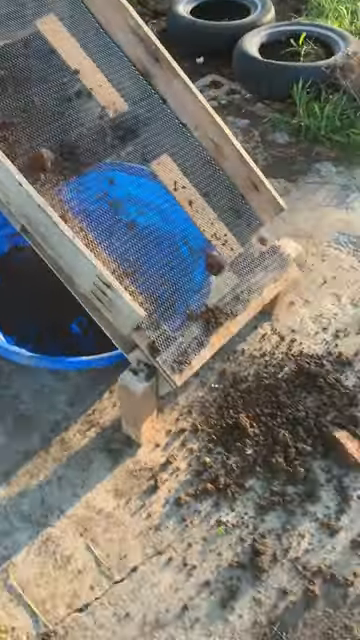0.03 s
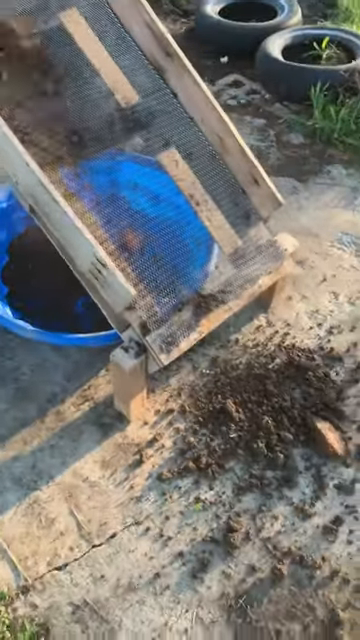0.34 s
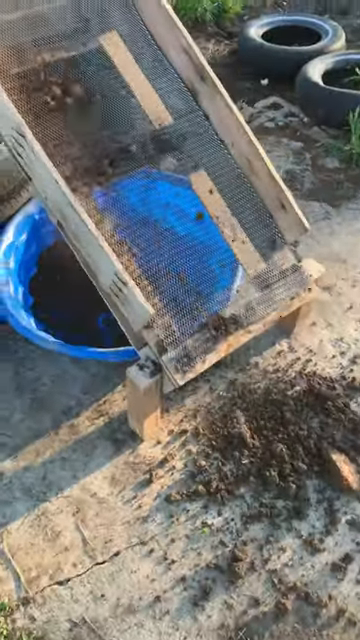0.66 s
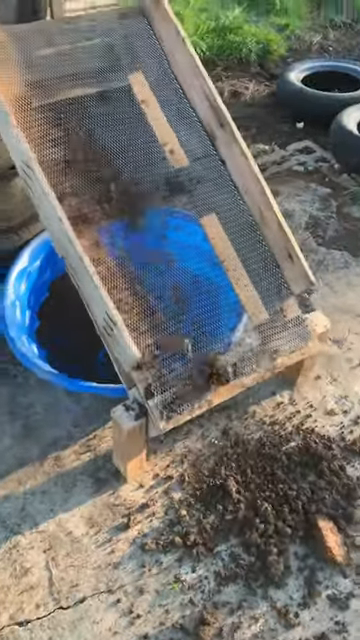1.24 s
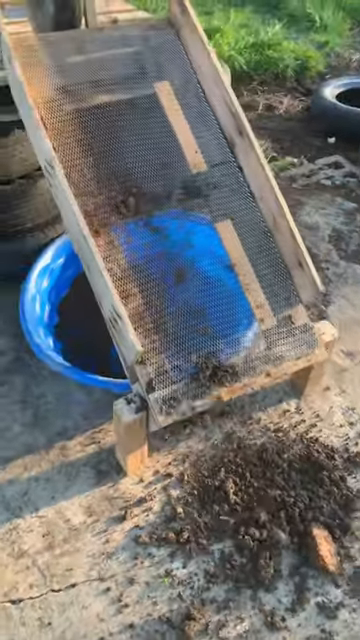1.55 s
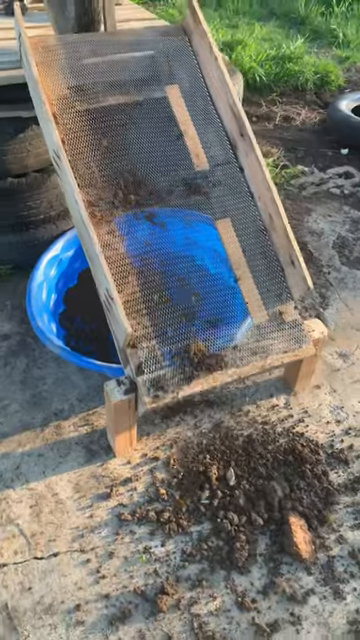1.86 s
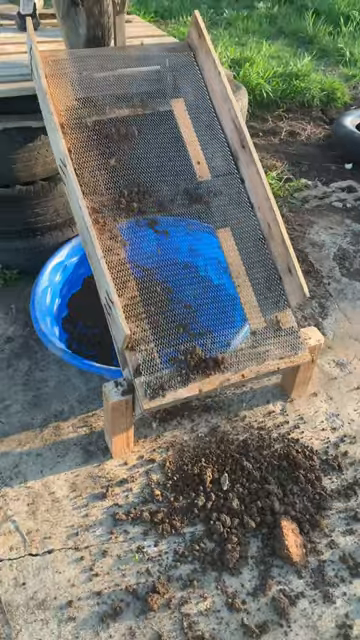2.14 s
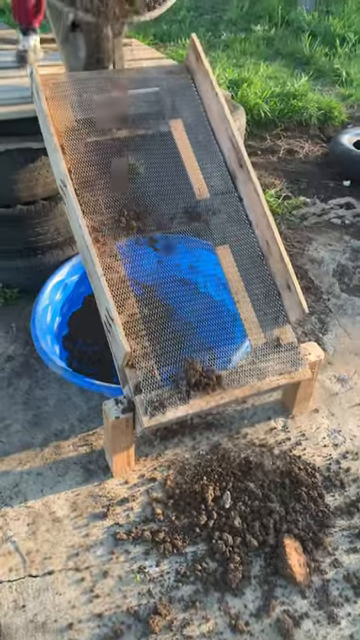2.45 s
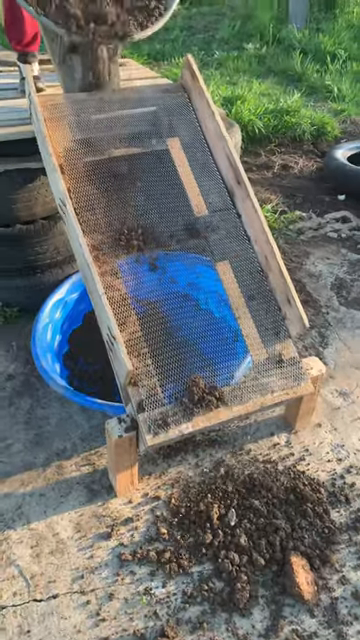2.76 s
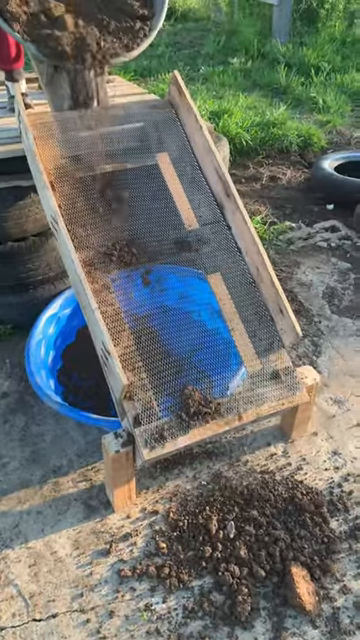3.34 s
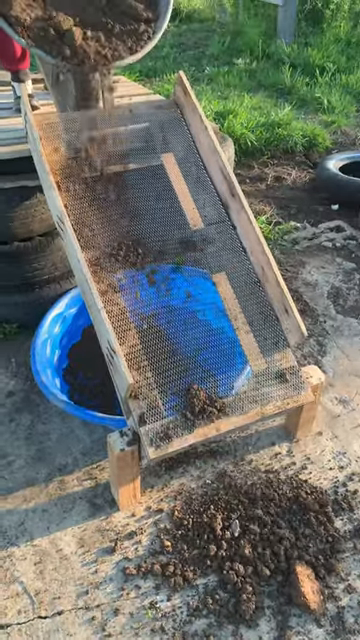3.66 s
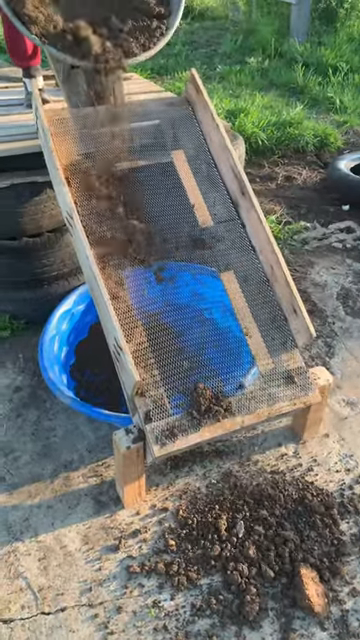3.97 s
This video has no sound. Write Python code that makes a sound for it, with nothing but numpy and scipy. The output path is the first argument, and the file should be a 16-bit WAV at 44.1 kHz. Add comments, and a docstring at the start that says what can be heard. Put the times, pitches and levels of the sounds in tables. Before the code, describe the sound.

Dry soil pours down a sloping wire-mesh sieve in a continuous, uneven hiss. Crumbs patter, stones tick on the wires, clods thud and hard lumps knock on wood and concrete. A faint bird chirps over a low outdoor rumble.

```python
"""A rush of dry soil hisses and thuds as it is tipped from a bucket down a sloping wire-mesh sieve.
Fine earth hisses through the mesh, stones tick on the wires, crumbs patter and clods thud on screen
and tub. Hard lumps burst, or knock on the wooden frame and the concrete. Behind them are a low outdoor
rumble and a faint, distant bird. Left and right differ, which makes the soil sound wide."""
import sys
import numpy as np
from scipy import signal
from scipy.fft import rfft, irfft, next_fast_len
from scipy.io import wavfile
from scipy.ndimage import map_coordinates

SR = 44100
rng = np.random.default_rng(int(sys.argv[2]) if len(sys.argv) > 2 else 0)


def wav_out(sig):
    """Save sig, one row per channel (or a flat mono array), as 16-bit PCM at SR to the path in sys.argv[1]."""
    wavfile.write(sys.argv[1], SR, np.round(np.clip(np.atleast_2d(sig).T, -1, 1) * 32767).astype(np.int16))


N = 176400  # 4 seconds

# How strongly earth runs down the mesh: time_s, level_db (levels in all tables are relative)
EARTH_FLOW = [(0.0, -29.5), (0.05, -37.5), (0.09, -32), (0.18, -30.5), (0.27, -35), (0.39, -34.5),
              (0.45, -31.0), (0.72, -37.5), (0.81, -32), (0.92, -36), (0.96, -32), (0.99, -36), (1.26, -38),
              (1.32, -34.5), (1.44, -38.5), (1.56, -37), (1.59, -34), (1.71, -39), (1.74, -35),
              (1.83, -43.5), (1.87, -39.5), (2.07, -35.5), (2.13, -37), (2.18, -35.5), (2.28, -42.5),
              (2.42, -34.5), (2.61, -40.5), (2.68, -36), (3.02, -36.5), (3.07, -41.5), (3.13, -37),
              (3.27, -36.5), (3.42, -42.5), (3.54, -35.5), (3.62, -39), (3.7, -33), (3.79, -39),
              (3.87, -39), (3.99, -30.5)]
# Tone of grains hitting wire: frequency_hz, gain_db
GRAIN_TONE = [(300, -37.5), (1200, 4.5), (2700, 1.5), (4200, 1.5), (5800, -1), (7300, -3), (8400, -1),
              (11800, -2.5), (12900, -8.5), (13700, -13.5), (15200, -15.5), (16500, -34)]


def amp(db):
    """Turns decibels into a gain."""
    return 10 ** (np.asarray(db) / 20)


def unit(x):
    """Scales a sound to an average (rms) level of 1."""
    return x / np.sqrt(np.mean(x ** 2) + 1e-20)


def along(points, hz):
    """Reads between (frequency_hz, value) points on a log scale."""
    point_hz, values = np.transpose(points)
    return np.interp(np.log(hz + 1), np.log(point_hz + 1), values)


def flow(rows):
    """A gain for every sample, gliding between (time_s, level_db) rows."""
    time_s, level_db = np.transpose(rows)
    return amp(np.interp(np.arange(N) / SR, time_s, level_db))


def wobble(per_s):
    """A smooth curve through per_s random values a second."""
    return map_coordinates(rng.standard_normal(1024), [np.arange(N) * per_s / SR], mode="wrap")


def filtered(x, response):
    """Scales and shifts each frequency of x by response(hz)."""
    size = next_fast_len(N + SR // 4)
    return irfft(rfft(x, size) * response(np.fft.rfftfreq(size, 1 / SR)), size)[..., :N]


def coloured(x, tone, size=4096):
    """Gives x the tone drawn by (frequency_hz, gain_db) points."""
    cepstrum = irfft(np.log(amp(along(tone, np.fft.rfftfreq(size, 1 / SR)))))
    # Folded so the filter rings after a hit, never before it.
    cepstrum[1:size // 2] *= 2
    cepstrum[size // 2 + 1:] = 0
    return signal.fftconvolve(x, irfft(np.exp(rfft(cepstrum))))[:len(x)]


def add(track, start_s, sound):
    """Mixes a sound into a track."""
    part = track[max(0, round(start_s * SR)):][:len(sound)]
    part += sound[:len(part)]


def contacts(times, hz, gains, cycles, size):
    """Tiny impacts, each a sine wave that fades 60 dB in so many cycles."""
    samples = np.arange(size)
    turns = hz[:, None] * samples / SR
    rings = gains[:, None] * np.sin(2 * np.pi * turns) * np.exp(-np.log(1000) * turns / cycles)
    positions = (times * SR).astype(int)[:, None] + samples
    return np.bincount(positions.ravel(), rings.ravel())


def shower(count):
    """Random times, signs, pitch offsets and weights of falling grains."""
    draws = rng.random((count, 3))
    weight = np.minimum(-np.log(draws[:, 2]), 4)  # many light, few heavy
    return draws[:, 0] * N / SR, np.sign(draws[:, 1] - .5), rng.standard_normal(count), weight


def patter(per_s, centre_hz, spread, cycles, weight_db, size):
    """A steady rain of small impacts of varied pitch and weight."""
    times, sign, offset, weight = shower(per_s * N // SR)
    hz = np.clip(centre_hz * np.exp(spread * offset), 60, SR / 3)
    rain = contacts(times, hz, sign * amp(weight_db * weight), cycles, size)
    return np.pad(rain, (0, N))[:N]


def lump(hz, spread, cycles, settle_s, fade_db, count, size):
    """One lump lands: a first contact, then weaker ones of scattered pitch."""
    order = np.arange(count)
    progress = (order + rng.uniform(-.5, 0.53, count) * (order > 0)) / count
    pitch = hz * np.exp(spread * rng.permutation(np.linspace(-2, 2, count)) * np.sqrt(progress))
    gains = rng.choice([-1, 1], count) * amp(-fade_db * progress)
    hit = contacts(progress * settle_s, pitch, gains, cycles, size)
    return hit / np.sqrt(np.sum(hit ** 2) / (SR / 100))  # the energy of 10 ms at level 1


def rumble(gain_db=-51, side_db=-11.5):
    """Low outdoor background, nearly alike left and right."""
    # Tone of the background: frequency_hz, gain_db
    tone = [(20, -15), (38, -11), (54, 6.5), (72, 5), (110, -0.5), (200, -2), (600, -3.5), (3000, -35),
            (16000, -58)]
    middle, side = (unit(coloured(rng.standard_normal(N), tone)) for _ in range(2))
    return amp(gain_db) * (middle + amp(side_db) * np.array([side, -side]))


def bird(chirp_s=0.085, top_hz=5300, sag_hz=760):
    """Each chirp is a pure whistle that arches up and down again."""
    # Distant chirps: start_s, level_db
    chirps = [(1.975, -45), (2.62, -38), (2.91, -42), (3.455, -44), (3.745, -45)]
    out, arch = np.zeros(N), np.linspace(-1, 1, int(chirp_s * SR))
    pitch_hz = top_hz - sag_hz * arch ** 2
    whistle = np.sin(2 * np.pi * np.cumsum(pitch_hz) / SR) * np.sqrt(1 - arch ** 2)
    for start_s, level_db in chirps:
        add(out, start_s, amp(level_db) * whistle)
    return out


def bursts(gain_db=-7, rise_s=0.00096, spray_s=0.0064, spray_db=-16):
    """A dry lump breaks with a bright crack and a short spray of grit."""
    # Lumps breaking: start_s, level_db
    breaks = [(0.137, -15.5), (0.2179, -22), (0.3565, -25), (0.7235, -24), (1.59, -21.5), (1.6762, -20),
              (1.703, -26), (1.736, -27), (1.7765, -25), (1.923, -29), (2.2034, -24), (2.3541, -16.5),
              (2.3827, -21.5), (3.1006, -17), (3.3654, -20), (3.6594, -25), (3.9526, -23)]
    # Tone of a burst: frequency_hz, gain_db
    tone = [(300, -27), (1500, -10), (4000, 8.5), (7000, 3.5), (11500, 6.5), (13500, -6), (16000, -20)]
    out, t = np.zeros(N), np.arange(SR // 30) / SR
    crack = t / rise_s * np.exp(1 - t / rise_s)
    spray = amp(spray_db) * np.exp(-t / spray_s)
    for start_s, level_db in breaks:
        add(out, start_s, amp(level_db + gain_db) * (crack + spray) * rng.standard_normal(len(t)))
    return coloured(out, tone)


def knocks(gain_db=-8.8, crack_s=.0007, crack_db=3.5):
    """Hard lumps clack on wood and concrete: a sharp crack, then a short rattle as they settle."""
    # Hard lumps landing: start_s, level_db, pitch_hz
    landings = [(0.0832, -14.5, 1500), (0.1087, -14.5, 1600), (0.1356, -18, 1500), (0.2435, -17.5, 1500),
                (0.3496, -18, 1300), (0.597, -18, 1490), (0.7257, -15.5, 1870), (0.7931, -18.5, 1570),
                (0.8305, -16.5, 1300), (0.8904, -16.5, 1330), (0.9507, -18.5, 1280), (0.9624, -15.5, 1410),
                (1.2131, -10.5, 2170), (1.2194, -13.5, 1400), (1.3194, -19.5, 1330), (1.4827, -17, 1210),
                (1.5793, -16.5, 1190), (1.6272, -14, 1200), (1.7315, -18, 1420), (1.9245, -20, 965),
                (1.9824, -15.5, 990), (2.1041, -18.5, 1490), (2.1644, -18, 966), (2.225, -21, 1310),
                (2.5565, -19, 895), (2.594, -22.5, 1490), (2.703, -17.5, 1400), (2.7427, -17.5, 1550),
                (3.0435, -19, 1530), (3.1014, -12.5, 1490), (3.1353, -19.5, 1200), (3.1788, -19.5, 1430),
                (3.484, -20.5, 1630), (3.5259, -16.5, 1570), (3.5528, -19, 1410), (3.6476, -16.5, 950),
                (3.936, -17.5, 1420)]
    # Tone of a knock: frequency_hz, gain_db
    tone = [(200, -13), (700, -9), (1400, -2.5), (2800, 0.5), (6000, -2.5), (12000, -30)]
    out = np.zeros(N)
    for start_s, level_db, pitch_hz in landings:
        rattle = lump(pitch_hz, spread=0.61, cycles=7, settle_s=.007, fade_db=12, count=11, size=768)
        t = np.arange(len(rattle)) / SR
        crack = amp(crack_db) * np.exp(-t / crack_s) * rng.standard_normal(len(t))
        add(out, start_s, amp(level_db + gain_db) * (rattle + crack))
    return coloured(out, tone)


def small_clods(gain_db=-2.2):
    """Small soft clods drum on screen and tub."""
    # Flow of small clods: time_s, level_db
    tumble = [(0.0, -36.5), (0.63, -32), (0.72, -40), (0.81, -33.5), (1.14, -38), (1.44, -37), (1.62, -31),
              (1.68, -35.5), (1.86, -39), (2.19, -33), (2.25, -38), (2.4, -36), (2.67, -40.5), (2.73, -36),
              (3.45, -41.5), (3.51, -36.5), (3.84, -37.5), (3.92, -33.5), (3.99, -30)]
    # Tone of their drumming: frequency_hz, gain_db
    tone = [(40, -14), (120, -10), (220, -6.5), (340, 3.5), (560, -2.5), (800, 0), (1500, -1.5),
            (4000, -10)]
    rain = patter(per_s=280, centre_hz=472, spread=0.44, cycles=6, weight_db=1.44, size=2048)
    return amp(gain_db) * flow(tumble) * unit(coloured(rain, tone))


def heavy_clods(thud_db=-10):
    """Single heavy clods thud; big soft masses sound deeper and settle more slowly."""
    # Clods landing on screen and tub: start_s, level_db, pitch_hz
    thuds = [(0.007, -20.5, 342), (0.136, -11, 370), (0.148, -18.5, 440), (0.241, -14, 380),
             (0.324, -16, 403), (0.424, -25, 670), (0.592, -15, 312), (0.854, -21.5, 350),
             (0.952, -19, 284), (1.059, -22.5, 690), (1.216, -21.5, 410), (1.36, -19.5, 353),
             (1.622, -16.5, 420), (1.738, -22, 347), (1.982, -20, 293), (1.984, -21, 1010),
             (2.104, -15, 275), (2.18, -22.5, 420), (2.228, -23, 326), (2.356, -19, 298), (2.395, -16, 363),
             (2.439, -19.5, 383), (2.557, -22.5, 600), (2.587, -18.5, 370), (2.673, -23.5, 530),
             (2.73, -20.5, 301), (2.976, -20.5, 426), (3.101, -16, 414), (3.178, -16.5, 330),
             (3.26, -24, 400), (3.377, -19.5, 370), (3.719, -21, 860), (3.845, -22.5, 450),
             (3.878, -19, 320), (3.92, -17, 392), (3.96, -20, 850), (3.982, -17, 383)]
    # Masses slumping into the tub: start_s, level_db, pitch_hz
    slumps = [(0.146, -23, 296), (0.17, -24, 185), (0.25, -22, 190), (0.334, -21, 152), (3.71, -28, 213)]
    # Tone of both: frequency_hz, gain_db
    tone = [(60, -16.5), (180, -8.5), (350, 2), (600, 1.5), (820, 6.5), (1600, -2.5), (4000, -17)]
    out = np.zeros(N)
    for start_s, level_db, pitch_hz in thuds:
        thud = lump(pitch_hz, spread=0.43, cycles=6, settle_s=0.013, fade_db=12.5, count=8, size=2048)
        add(out, start_s, amp(level_db + thud_db) * thud)
    for start_s, level_db, pitch_hz in slumps:
        slump = lump(pitch_hz, spread=0.43, cycles=6, settle_s=0.0241, fade_db=4, count=6, size=4096)
        add(out, start_s, amp(level_db) * slump)
    return coloured(out, tone)


def stones(gain_db=-1.5, ring_s=0.0005, ring_db=-11):
    """A stone strikes a wire: one hard click and a very short ring."""
    # Stones hitting wires: start_s, level_db
    ticks = [(0.1096, -29), (0.136, -20), (0.1904, -28), (0.4122, -32), (0.4713, -24), (0.6717, -30),
             (0.9369, -30.5), (0.9978, -31), (1.0666, -20), (1.2798, -29), (1.674, -29), (1.7047, -24.5),
             (1.7564, -37), (2.0547, -32), (2.204, -28), (2.3557, -20), (2.3835, -24), (2.6968, -25.5),
             (2.7579, -29), (2.9286, -29.5), (3.1026, -25.5), (3.1217, -28), (3.2072, -30), (3.5534, -31),
             (3.7576, -27.5), (3.835, -27.5), (3.9635, -22)]
    # Tone of a tick: frequency_hz, gain_db
    tone = [(2500, -18), (5500, 1), (11500, 3), (16000, -14)]
    out, t = np.zeros(N), np.arange(SR // 300) / SR
    click = t == 0
    for start_s, level_db in ticks:
        ring = amp(ring_db) * np.exp(-t / ring_s) * rng.standard_normal(len(t)) * (t > 0)
        add(out, start_s, amp(level_db) * unit(click + ring))
    return amp(gain_db) * coloured(out, tone)


def crumbs(gain_db=-2.1, clump_db=1.4):
    """Pea-sized crumbs bounce down the mesh in small clumps."""
    # Tone of the crumbs: frequency_hz, gain_db
    tone = [(200, -7), (500, 0), (800, 0.5), (1050, -7.5), (1380, 4.5), (2000, -0.5), (2800, -5.5),
            (4000, 7), (8000, -6)]
    rain = patter(per_s=900, centre_hz=1460, spread=0.49, cycles=8.4, weight_db=2.2, size=512)
    clumps = amp(clump_db * wobble(per_s=70))
    return amp(gain_db) * flow(EARTH_FLOW) * unit(coloured(rain * clumps, tone))


def grit(gain_db=-3.5):
    """Larger sharp grains snap against the wires, each at its own pitch."""
    rain = patter(per_s=450, centre_hz=6160, spread=0.54, cycles=8, weight_db=4.4, size=384)
    return amp(gain_db) * flow(EARTH_FLOW) * unit(coloured(rain, GRAIN_TONE))


def fine_earth(gain_db=-0.7, per_s=9000, weight_db=4.0, clump_db=1.8):
    """Thousands of grains tick on the wires in clumps and blur into a hiss."""
    times, sign, _, weight = shower(per_s * N // SR)
    ticks = np.bincount((times * SR).astype(int), sign * amp(weight_db * weight), N)[:N]
    clumps = amp(clump_db * wobble(per_s=90))
    return amp(gain_db) * flow(EARTH_FLOW) * unit(coloured(ticks * clumps, GRAIN_TONE))


def ground_scatter(sound, fade_s=.03):
    """Brief, blurred echoes off ground and frame, different left and right."""
    # Tone of the echoes: frequency_hz, gain_db
    tone = [(40, -35), (220, -25), (500, -7), (1000, -8.5), (1500, -6), (2300, -4), (3400, -1.5),
            (4700, -21.5), (5700, -3), (6900, -4.5), (7900, 1.5), (9000, -23), (10000, -4), (11200, -9),
            (14000, -13)]
    spectrum = signal.stft(sound, SR, nperseg=128)[2]
    kept = np.exp(-np.log(1e6) * 64 / SR / fade_s)  # 60 dB down after fade_s
    power = signal.lfilter([0, 1 - kept], [1, -kept], abs(spectrum) ** 2)
    noise = signal.stft(rng.standard_normal((2, N)), nperseg=128)[2]
    echoes = signal.istft(noise / noise.std() * np.sqrt(power), nperseg=128)[1][:, :N]
    return filtered(echoes, lambda hz: amp(along(tone, hz)))


def stereo_width(sound):
    """Left and right differ in level and in phase (where a wave is in its cycle)."""
    # Left-right phase difference that gives the soil its stereo width, rising in steps with
    # frequency: frequency_hz, phase_radians
    phase = [(20, 0.5), (250, -0.03), (620, 1.35), (900, 0.3), (1150, -0.14), (1950, 0.19), (2700, 2.5),
             (3450, 1.58), (4050, 2), (4400, 3), (5000, 3), (5700, 5.5), (6450, 4), (7400, 7), (8450, 9.5),
             (9400, 9.5), (10600, 13.5), (11500, 12.5), (12550, 16.5), (13650, 16), (14700, 19.5)]
    # How much louder the left side is: frequency_hz, gain_db
    balance = [(50, -3), (350, -1.8), (600, 0), (950, 6), (1400, -0.5), (3000, -0.5), (12000, -0.5)]
    sides = np.array([[.5], [-.5]])
    widen = lambda hz: amp(sides * along(balance, hz)) * np.exp(1j * sides * along(phase, hz))
    return filtered(sound, widen)


def scene():
    """The falling soil and the bird in stereo, over the rumble."""
    on_mesh = fine_earth() + grit() + stones() + crumbs()
    sound = on_mesh + small_clods() + heavy_clods() + knocks() + bursts() + bird()
    return stereo_width(sound) + ground_scatter(sound) + rumble()


def record(dry, low_cut_hz=38, top_hz=16300):
    """The recorder drops the deepest bass and the highest treble."""
    low_cut = signal.butter(3, low_cut_hz, "high", fs=SR, output="sos")
    return filtered(signal.sosfilt(low_cut, dry), lambda hz: hz < top_hz)


dry = scene()
out = record(dry)
wav_out(out)
```